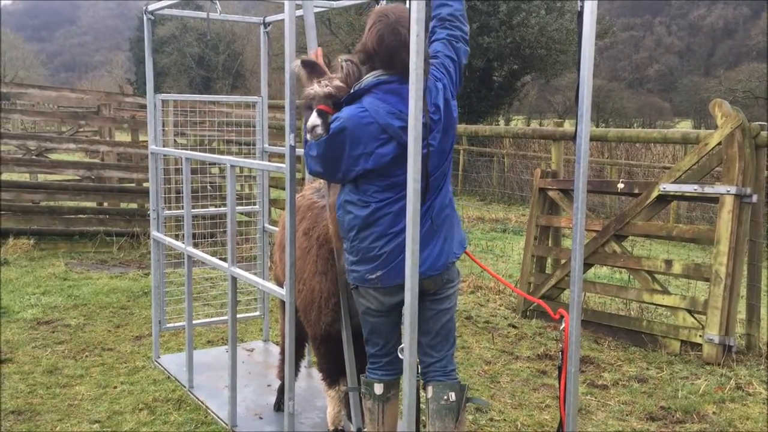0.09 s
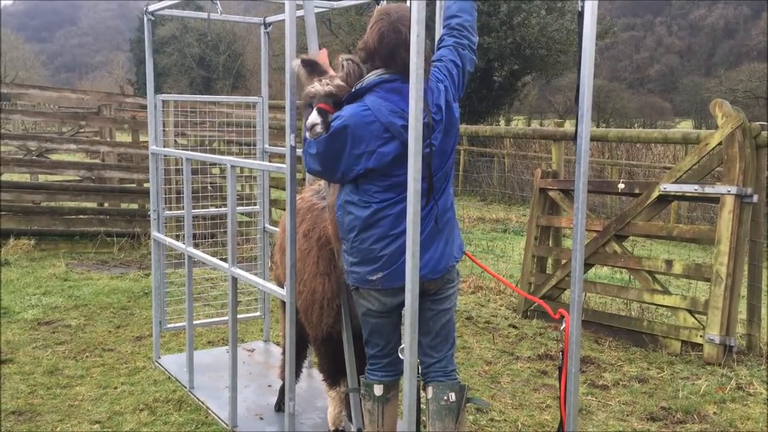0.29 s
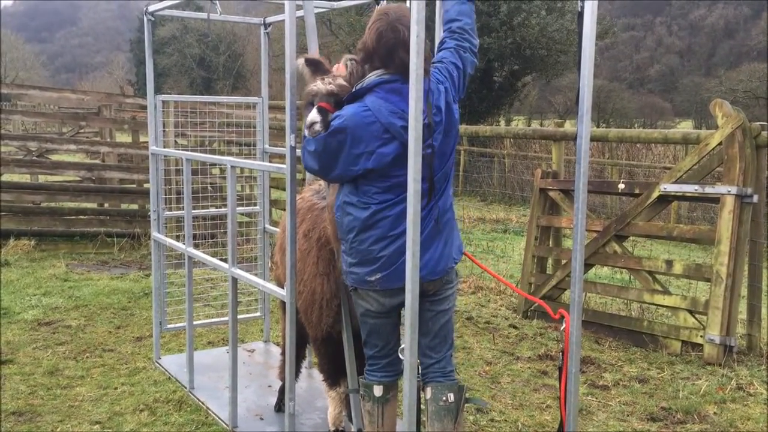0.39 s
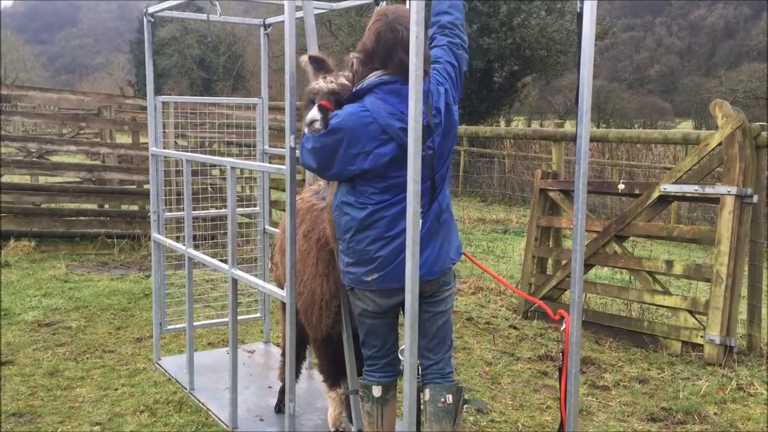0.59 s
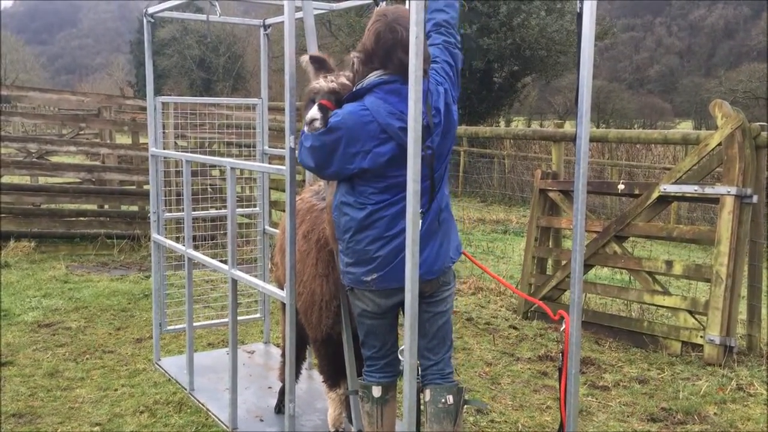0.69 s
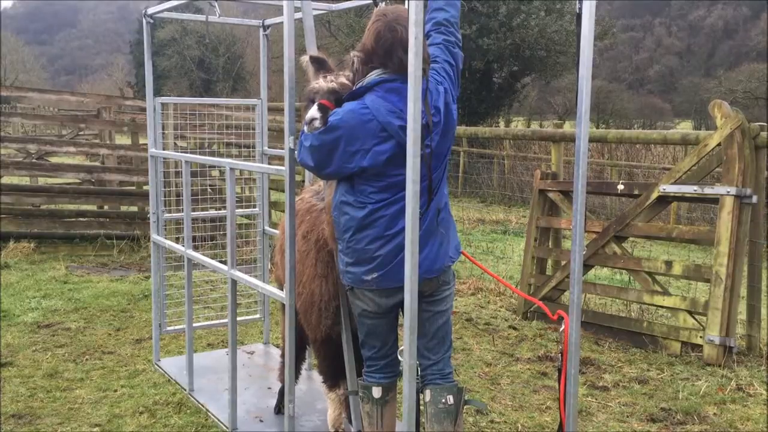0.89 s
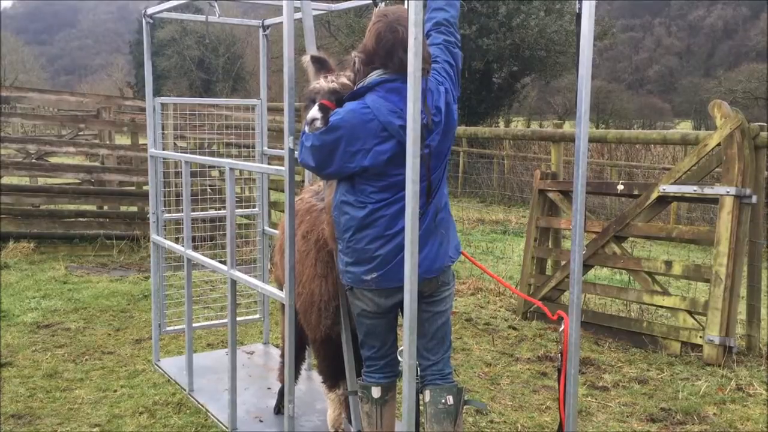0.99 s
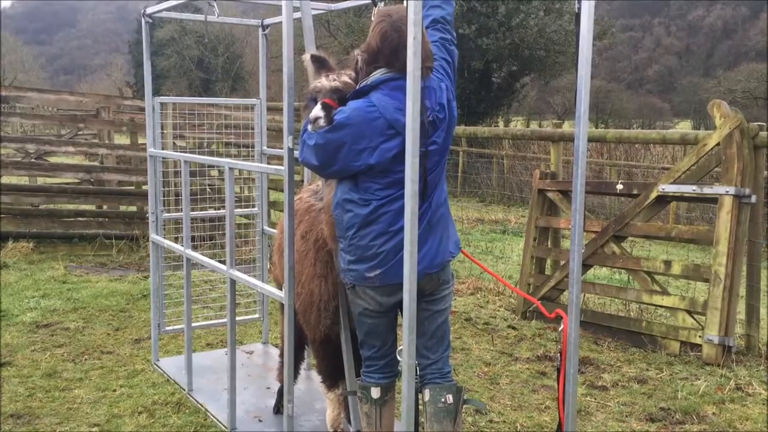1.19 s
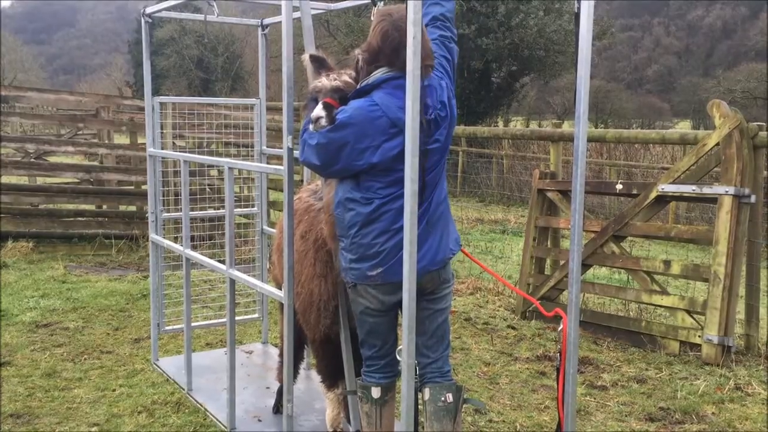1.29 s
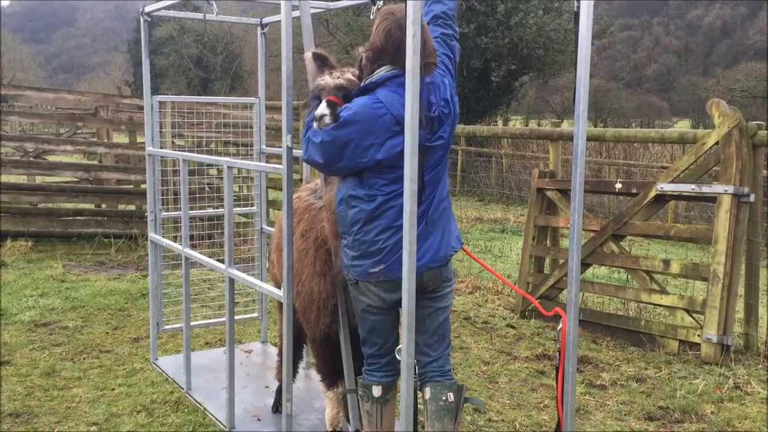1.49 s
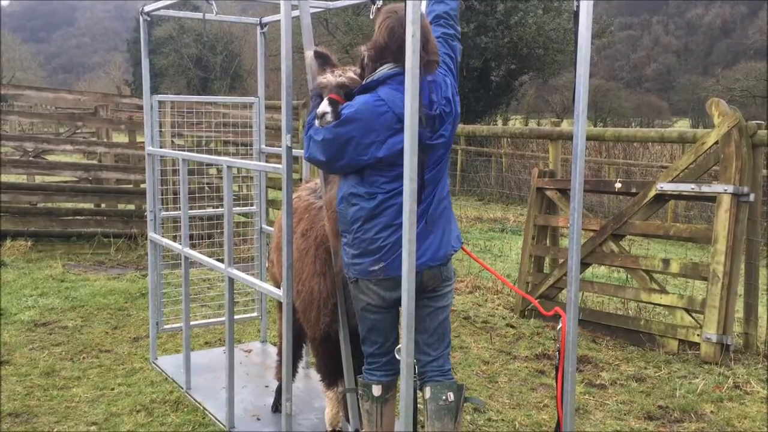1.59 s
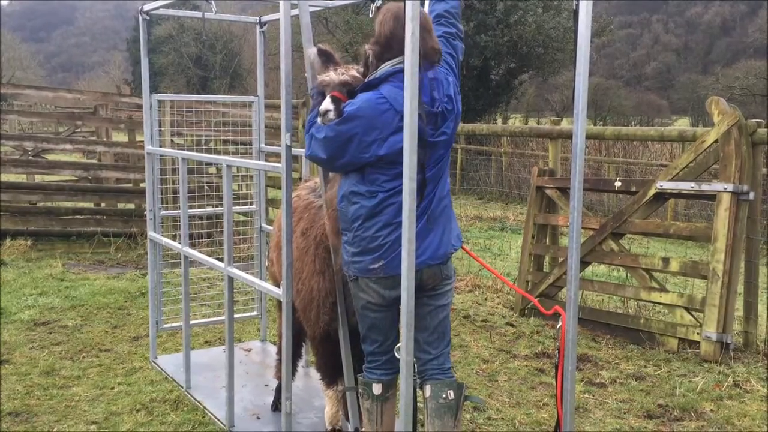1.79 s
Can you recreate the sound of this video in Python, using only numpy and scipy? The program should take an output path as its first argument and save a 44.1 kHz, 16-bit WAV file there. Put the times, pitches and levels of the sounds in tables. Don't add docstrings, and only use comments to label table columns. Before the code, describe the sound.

Loud metallic clang of a steel animal chute, ringing out, followed by quiet knocks and rubbing

```python
import sys
import numpy as np
from scipy import signal
from scipy.fft import rfft, irfft
from scipy.io import wavfile
from scipy.ndimage import uniform_filter1d

SR = 44100
rng = np.random.default_rng(int(sys.argv[2]) if len(sys.argv) > 2 else 0)


def level_to_linear(level):
    exponent = np.asarray(level, float) / 20
    return 10 ** exponent


def unload_wav(signal):
    wavfile.write(
        sys.argv[1],
        SR,
        np.round(np.clip(np.atleast_2d(signal).T, -1, 1) * 32767).astype(np.int16),
    )


N = 79380
T = np.arange(N) / SR

# freq_hz, density_db
STEEL_RUB = [(59, -34), (100, -9.5), (373, -2.5), (535, -13.5), (691, -2.5), (2170, -10), (3540, -17.5),
             (16000, -30)]


def evened(x):
    return x / np.sqrt(np.mean(x ** 2) + 1e-20)


def noise(points, patchy_db):
    frames = N // 128 + 5
    a, b, c = rng.standard_normal((frames, 257, 3)).T
    patches = uniform_filter1d(c, size=5, axis=0)
    patches = evened(uniform_filter1d(patches, size=12, axis=1))
    x = signal.istft((a + 1j * b) * level_to_linear(patchy_db * patches), nperseg=512, noverlap=384)[1][:N]
    point_hz, point_db = np.transpose(points)
    hz = np.fft.rfftfreq(N, 1 / SR)
    db = np.interp(np.log(hz + 1), np.log(point_hz + 1), point_db, left=-70, right=-70)
    return evened(irfft(rfft(x) * level_to_linear(db), N))


def puff(hz, width_hz):
    off = (np.fft.rfftfreq(N, 1 / SR) - hz) / (width_hz / 2)
    return evened(irfft(rfft(rng.standard_normal(N)) / (1 + off ** 4), N))


def resonate(x, hz, width_hz):
    turn = np.exp(2j * np.pi * hz * T)
    r = np.exp(-np.pi * abs(width_hz) / SR)
    return 2 * (turn * signal.lfilter([1 - r], [1, -r], x / turn)).real


def ring(hz, waver_db):
    waver = np.interp(T, np.linspace(0, N / SR, 90), rng.standard_normal(90))
    return np.sin(2 * np.pi * (hz * T + rng.random())) * level_to_linear(waver_db * waver)


def shape(start_s, rise_s, hold_s, t60_s):
    rise = np.clip((T - start_s) / rise_s, 0, 1) ** 2
    return rise * level_to_linear(-60 * np.maximum(T - start_s - rise_s - hold_s, 0) / t60_s)


def curve(rows):
    s, db = np.transpose(rows)
    return level_to_linear(np.interp(T, s, db, left=-120, right=-120))


def open_air():
    # freq_hz, density_db
    air_colour = [(120, -31.5), (180, -5.5), (300, -10), (500, -17.5), (1000, -13.5), (2200, -22),
                  (5000, -30.5), (15800, -39.5)]
    wind_colour = [(12, -55), (20, -28), (31, -10.5), (54, 4), (140, -5), (166, -1.5), (195, -15),
                   (300, -23.5), (390, -52.5), (660, -120)]
    # time_s, level_db
    gusts = [(0.0, -56.5), (0.17, -54), (0.284, -54), (0.376, -49), (0.732, -69), (0.772, -50.5),
             (1.392, -59.5), (1.764, -61.5), (1.8, -47)]
    air = level_to_linear(-64) * noise(air_colour, 1.8)
    return air + level_to_linear(-2.0) * curve(gusts) * noise(wind_colour, 2.2)


def birds():
    # start_s, length_s, from_hz, to_hz, level_db
    calls = [(0.883, 0.079, 7430, 6140, -72.5), (1.042, 0.077, 7120, 6050, -73),
             (1.099, 0.0216, 6350, 5580, -68.5), (1.198, 0.058, 6950, 6020, -74.5),
             (1.254, .033, 6130, 5430, -76), (1.009, .026, 3740, 3470, -71.5),
             (1.028, .042, 3350, 3030, -72)]
    out = np.zeros(N)
    for s, length_s, from_hz, to_hz, db in calls:
        u = np.clip((T - s) / length_s, 0, 1)
        wobble = evened(uniform_filter1d(rng.standard_normal(N), size=150))
        fall = u + 0.043 * np.sin(2 * np.pi * u)
        pitch_hz = from_hz + (to_hz - from_hz) * fall + 70 * wobble
        swell = np.sin(np.pi * u ** 1.26) ** 0.26 * level_to_linear(3.1 * wobble)
        out = out + level_to_linear(db) * swell * np.sin(2 * np.pi * np.cumsum(pitch_hz) / SR)
    echo = rng.standard_normal(3000) * level_to_linear(-60 * T[:3000] / 0.15)
    echo = echo / np.linalg.norm(echo)
    return 1.14 * out + 0.53 * signal.oaconvolve(out, echo)[:N]


def knocks():
    knock_s = [.115, .16, .19, .338, 1.174, 1.18, 1.2, 1.2, 1.118, 1.5935, 1.712]
    # pitch_hz, width_hz, level_db, hold_s, t60_s
    colours = [(3673, 370, -62.5, 0.01, 0.055), (3500, 430, -54.5, 0.011, .05),
               (3600, 880, -57, .012, 0.046), (2900, 1800, -57, 0.038, 0.37),
               (3030, 2300, -59, 0.015, 0.051), (1310, 2400, -60, 0.0057, 0.41),
               (1380, 180, -63, 0.0084, 0.12), (398, 130, -60, 0.026, 0.11),
               (3425, 320, -67.5, 0.0081, 0.03), (1490, 1200, -48.5, 0.00021, 0.018),
               (1186, 5100, -63.5, 0.023, .06)]
    out = np.zeros(N)
    for s, (hz, width_hz, db, hold_s, t60_s) in zip(knock_s, colours):
        out = out + level_to_linear(db) * shape(s, .001, hold_s, t60_s) * puff(hz, width_hz)
    return out


def creaks():
    creak_s = [1.49, 1.512, 1.514, 1.53, 1.558, 1.575, 1.59, 1.6, 1.644, 1.666, 1.72, 1.64, 1.765, .249,
               .336]
    # hold_s, pitch_hz, level_db, t60_s
    tubes = [(0.017, 1100, -60, .06), (0.028, 3220, -69, .03), (0.036, 2045, -61.5, .08),
             (.012, 1220, -60, 0.072), (0.021, 3220, -61.5, 0.11), (.035, 2045, -59, 0.14),
             (0.032, 3450, -64, 0.096), (0.024, 3500, -67, 0.066), (0.0068, 3220, -67, .04),
             (0.013, 3230, -62.5, 0.035), (0.0084, 3220, -64.5, 0.036), (0.032, 1100, -61, .08),
             (.008, 2000, -66, .05), (0.0082, 2380, -34, 0.039), (0.011, 3330, -54, 0.048)]
    out = np.zeros(N)
    for s, (hold_s, hz, db, t60_s) in zip(creak_s, tubes):
        out = out + level_to_linear(db) * shape(s, .003, hold_s, t60_s) * puff(hz, 130)
    return out


def taps():
    # start_s, pitch_hz, peak_db, t60_s
    struck = [(1.5935, 1220, -42, .07), (1.5935, 900, -46, .1), (1.5935, 2150, -47, .025),
              (1.534, 1220, -50, .05), (1.604, 950, -46, .06), (1.62, 700, -47, .06),
              (1.667, 977, -47, .05), (1.695, 972, -51, .04), (1.713, 1030, -46, .04),
              (1.716, 3800, -56, .03), (1.722, 520, -45, .07), (1.722, 1900, -50, .03),
              (1.731, 800, -47, .04), (1.186, 1100, -54, .04), (1.186, 2600, -56, .02),
              (1.1755, 3950, -55, .04)]
    out = np.zeros(N)
    for s, hz, db, t60_s in struck:
        t = np.maximum(T - s, 0)
        out = out + level_to_linear(db - 60 * t / t60_s) * np.sin(2 * np.pi * hz * t)
    return out


def hinge_squeak():
    # start_s, rise_s, hold_s, t60_s, pitch_hz, level_db
    squeak = (1.535, .02, .15, .04, 4535, -70.5)
    s, rise_s, hold_s, t60_s, hz, db = squeak
    return level_to_linear(db) * shape(s, rise_s, hold_s, t60_s) * ring(hz, 2.5)


def rub(effort, rings, spectrum, ring_db, rub_db, slips_hz, grit_db):
    grit = level_to_linear(rub_db) * noise(spectrum, 3.0)
    tones = 0
    for hz, width_hz, db in rings:
        slips = (rng.random(N) < slips_hz / SR) * rng.standard_normal(N)
        slips = slips * level_to_linear(grit_db * np.minimum(rng.exponential(1, N), 3))
        tone = resonate(resonate(slips, hz, width_hz), hz, 4 * width_hz)
        tones = tones + level_to_linear(db) * evened(tone)
    return curve(effort) * (grit + level_to_linear(ring_db) * evened(tones))


def animal_shift():
    # time_s, effort_db
    effort = [(1.38, -69.5), (1.475, -61.5), (1.505, -55), (1.565, -49), (1.59, -53), (1.605, -45.5),
              (1.65, -49.5), (1.695, -54), (1.725, -48), (1.75, -55), (1.8, -55)]
    # pitch_hz, width_hz, level_db
    rings = [(167, 27, -3.5), (374, 51, 0.5), (525, 57, -7.5), (690, 30, -2), (950, 34, -1), (1103, 46, -6),
             (1238.4, 22, -8), (1710, 52, -8), (2030, 52, -7.5), (3230, 30, -15), (6840, 130, -21),
             (7300, 74, -25), (8550, 60, -26), (9700, 120, -28)]
    # freq_hz, density_db
    colour = [(59, -41), (100, -11.5), (163, -6.5), (570, -4.5), (970, -5.5), (2000, -7.5), (2750, -18.5),
              (3320, -19.5), (16000, -38)]
    return rub(effort, rings, colour, ring_db=-2.4, rub_db=-6.0, slips_hz=200, grit_db=3.1)


def bar_drag():
    # time_s, effort_db
    effort = [
        (.07, -76),
        (.11, -66.5),
        (.165, -47),
        (.185, -48.5),
        (.208, -42.5),
        (.216, -47),
    ]
    # pitch_hz, width_hz, level_db
    rings = [(345, 80, -2), (705, 72, -2), (965, 36, -2), (2000, 45, -5), (2380, 45, -6), (4380, 110, -15),
             (6770, 78, -14), (9550, 120, -13)]
    return rub(effort, rings, STEEL_RUB, ring_db=-6, rub_db=-1, slips_hz=700, grit_db=2.5)


def floor_plate():
    # start_s, pitch_hz, level_db, t60_s
    modes = [(.252, 160, -41.5, .5), (0.28, 112, -45, 0.39), (0.3, 598, -49, 0.28), (0.3, 366, -48, 0.55),
             (0.29, 411, -59, 1.6)]
    return sum(level_to_linear(db) * shape(s, 0.0047, 0, t60_s) * ring(hz, 4.5) for s, hz, db, t60_s in modes)


def tube_frame():
    # pitch_hz, level_db, t60_s
    tubes = [(1328, -2, 0.44), (1240, -3, .3), (1641, -6, .23), (2247, -7, 0.24), (2737, 1, 0.48),
             (2783, -9.5, .45), (3260, -6.5, .55), (3320, -7, 0.3), (3655, -14, .5), (3774, -10.5, 0.4),
             (974, -10, 0.59)]
    panel = [(6293, -14, .9), (6476, -13, .6), (6610, -15, .8), (6697, -2, .42), (6730, -3, .75),
             (7407, -11, 0.18), (7946, -16, .24), (9448, -2, .28), (9540, -6, 0.4), (9800, -13, .2),
             (10400, -9, .36)]
    out = np.zeros(N)
    for hz, db, t60_s in tubes + panel:
        peak_db = -53 + db + 60 * (0.34 - .26) / t60_s
        out = out + level_to_linear(peak_db) * shape(.24, .02, 0, t60_s) * ring(hz, 2.5)
    return out


def struck_bar():
    # pitch_hz, level_db
    modes = [(2990, -29), (3255, -24.5), (3330, -30.5), (3690, -28.5), (3770, -22.5), (3812, -24.5),
             (4785, -34), (6343, -33.5), (6850, -29.5), (9480, -31)]
    lands_s, damped_t60_s = .262, 0.078
    boost_db, boost_end_s, boost_fade_s = 3.5, .231, 0.0021
    free = shape(.217, 0.0075, 0, 0.78)
    damping = level_to_linear(-60 * np.maximum(T - lands_s, 0) / damped_t60_s)
    boost = level_to_linear(boost_db * np.clip((boost_end_s - T) / boost_fade_s + 1, 0, 1))
    return free * damping * boost * sum(level_to_linear(db) * ring(hz, 1.1) for hz, db in modes)


def body(blow, rebound):
    # pitch_hz, blow_db, rebound_db
    body_modes = [(356.4, -37, -41), (678.7, -30.5, -39.5), (979, -41.5, -40), (1335, -36, -46),
                  (1657, -36, -38.5), (1896, -24.5, -38), (2382, -25.5, -34.5), (2640, -31, -40),
                  (2900, -30, -39.5), (3190, -30.5, -37), (3470, -31.5, -38.5),
                  (5250, -41.5, -45.5), (5810, -43, -45.5), (7210, -34.5, -41.5), (7960, -36.5, -41),
             (8393, -32.5, -41), (8500, -40.5, -45), (9300, -38, -43), (9540, -35, -46),
             (11700, -45, -48.5)]
    out = np.zeros(N)
    for hz, blow_db, rebound_db in body_modes:
        out = out + (level_to_linear(blow_db) * blow + level_to_linear(rebound_db) * rebound) * ring(hz, 0.88)
    return out


def slam():
    # start_s, rise_s, hold_s, level_db, t60_s
    contacts = [
        (0.2167, 0.003, 0.0135, -15.5, 0.012),
        (0.244, 0.017, .003, -23, 0.14),
        (0.334, 0.013, 0.0076, -47.5, 0.24),
    ]
    # freq_hz, density_db
    crack = [(100, -28.5), (900, -22), (1500, -6.5), (2400, -4.5), (3700, -5.5), (5400, -12), (9800, -12),
             (15500, -23)]
    clatter = [(100, -9.5), (160, -9.5), (555, -9.5), (1000, -8), (3200, -2), (5000, -12.5), (9800, -10),
               (15500, -21.5)]
    blow, rebound, settle = [shape(s, rise_s, hold_s, t60_s) for s, rise_s, hold_s, _, t60_s in contacts]
    blow_db, rebound_db, settle_db = [row[3] for row in contacts]
    out = level_to_linear(blow_db) * blow * noise(crack, .6)
    out = out + level_to_linear(rebound_db) * rebound * noise(clatter, 1.8)
    out = out + level_to_linear(settle_db) * settle * noise(STEEL_RUB, 2.0)
    return out + body(blow, rebound) + struck_bar() + tube_frame() + floor_plate()


def scene():
    background = open_air() + birds()
    frame_noises = knocks() + creaks() + taps() + hinge_squeak()
    return (background + frame_noises + animal_shift() + bar_drag() + slam())[None]


def dropout_loss(x):
    # centre_s, length_s, above_hz, loss_db
    dropouts = [(.334, .018, 1500, -14), (.993, .022, 1300, -22), (1.271, .018, 1500, -16),
                (1.526, .022, 2300, -17), (1.803, .02, 2500, -12)]
    hz, _, z = signal.stft(x, SR, nperseg=1024, noverlap=896)
    level_db = 20 * np.log10(abs(z) + 1e-12)
    weak = level_db < uniform_filter1d(level_db, size=40, axis=0) + 11
    lost = np.zeros(N)
    for s, length_s, above_hz, loss_db in dropouts:
        treble = 1 / (1 + (above_hz / (hz[:, None] + 1)) ** 6)
        rest = signal.istft(z * weak * treble, SR, nperseg=1024, noverlap=896)[1][:N]
        window = np.cos(np.pi * np.clip((T - s) / length_s, -.5, .5)) ** .9
        lost = lost + rest * (1 - level_to_linear(loss_db)) * window
    return lost


def held_lines():
    # centre_s, pitch_hz, level_db
    lines = [(.993, 1363, -68.5), (.993, 2074, -78), (.993, 2498, -79), (.993, 3165, -78),
             (.993, 4420, -84), (.993, 6406, -84), (1.271, 1868, -70), (1.271, 2353, -77.5),
             (1.271, 2589, -81), (1.271, 5810, -75)]
    out = np.zeros(N)
    for s, hz, db in lines:
        window = np.cos(np.pi * np.clip((T - s) / 0.033, -.5, .5))
        out = out + level_to_linear(db + 3) * window * np.sin(2 * np.pi * hz * T)
    return out


def low_pass(x):
    return signal.sosfilt(signal.butter(12, 16650, fs=SR, output="sos"), x)


def record(dry):
    x = dry[0]
    limited = x / (1 + (x / .66) ** 4) ** .25
    out = limited - dropout_loss(x) + held_lines()
    out = signal.oaconvolve(out, signal.firwin(255, 15800, fs=SR), "same")
    return low_pass(out[None])


dry = scene()
out = record(dry)
unload_wav(out)
```